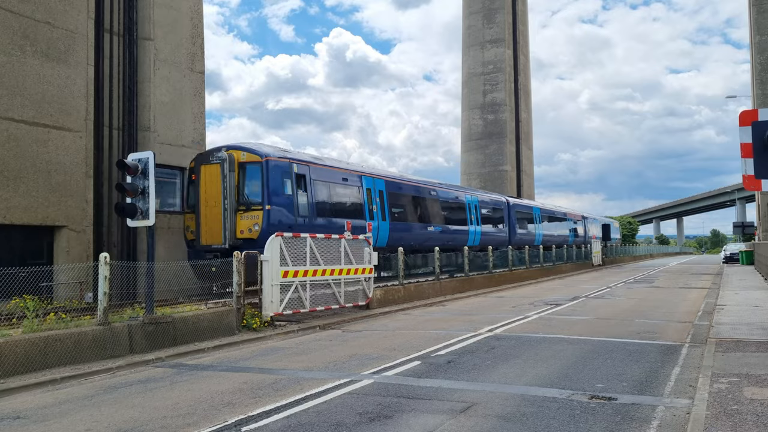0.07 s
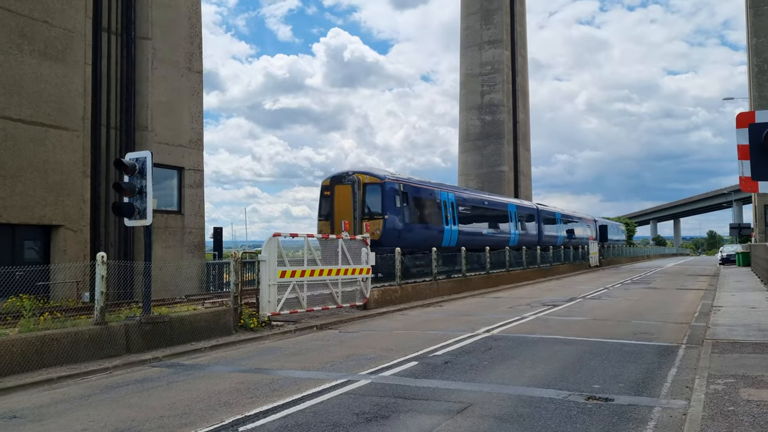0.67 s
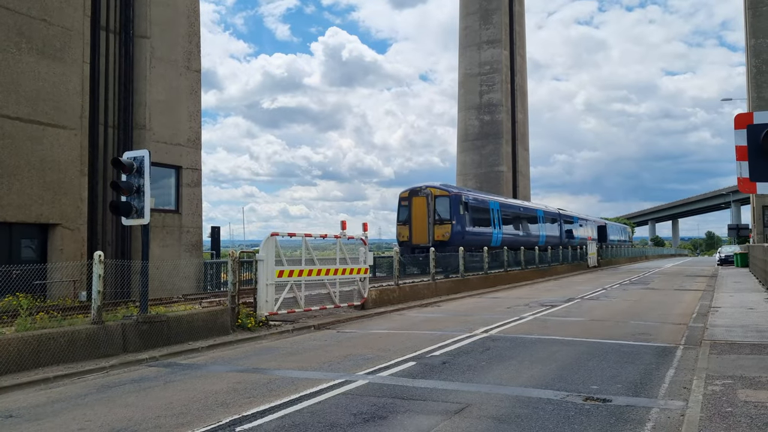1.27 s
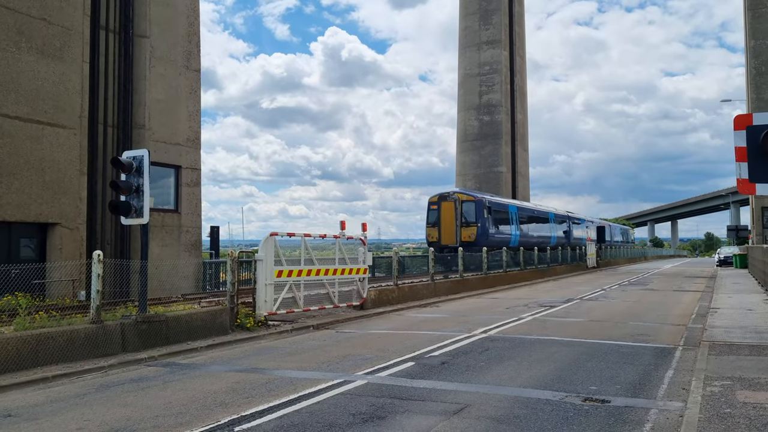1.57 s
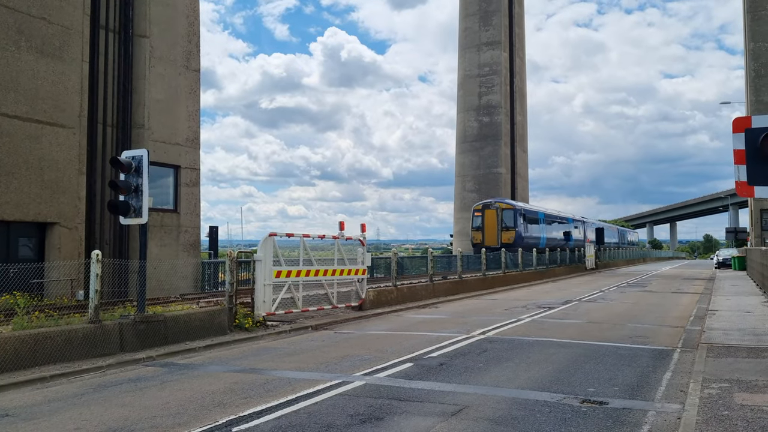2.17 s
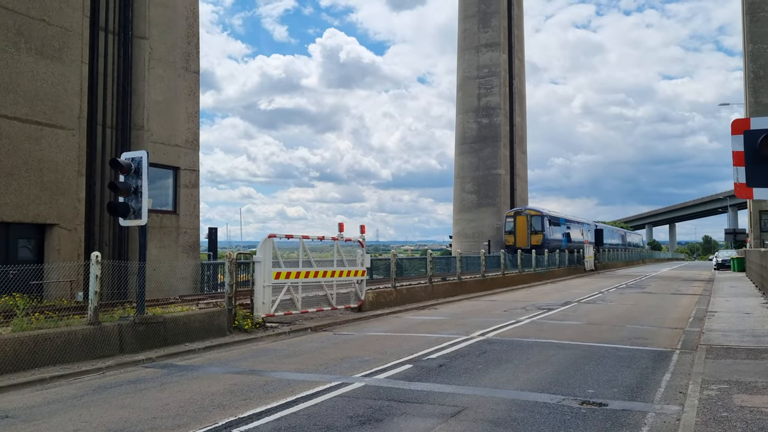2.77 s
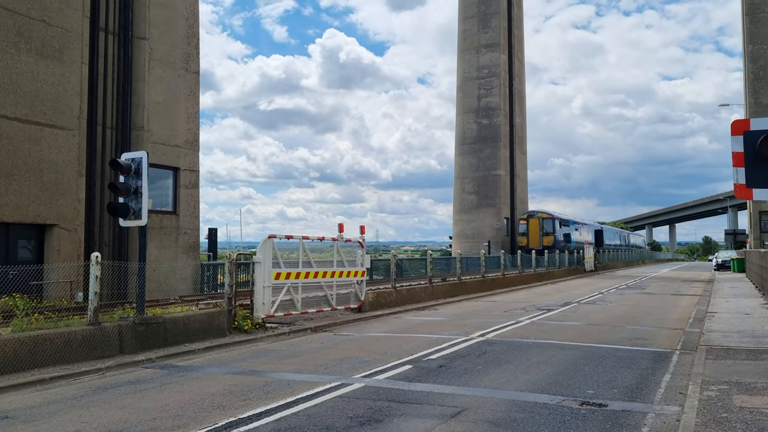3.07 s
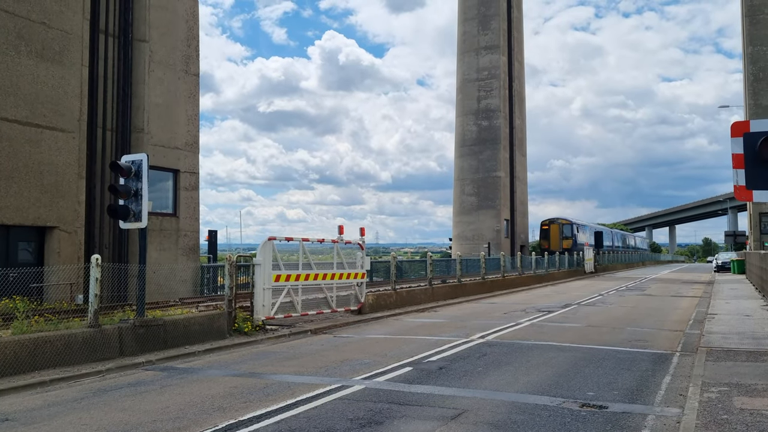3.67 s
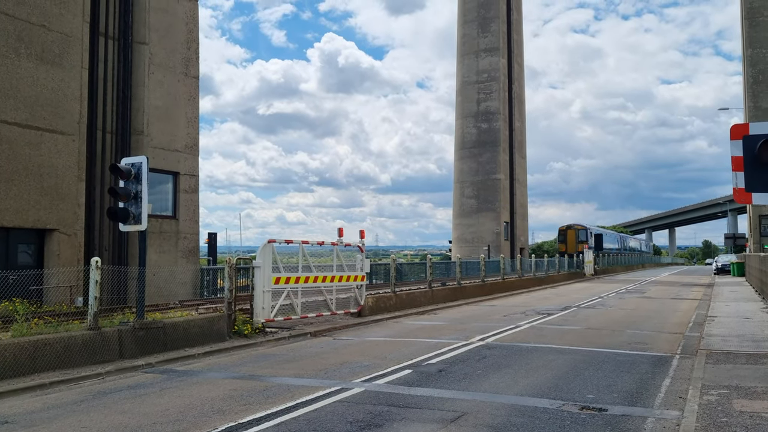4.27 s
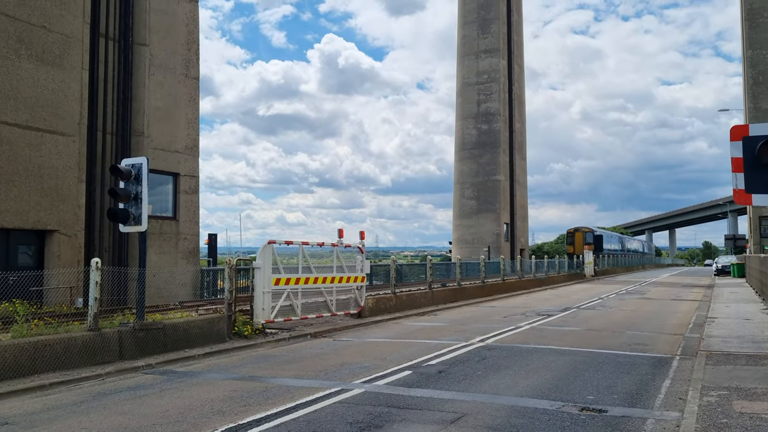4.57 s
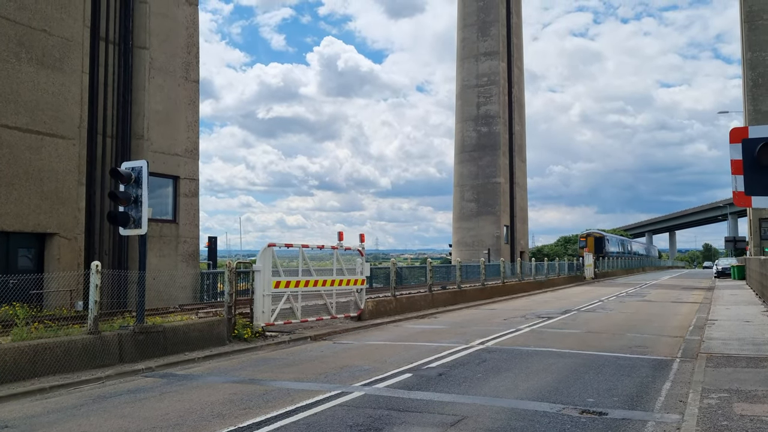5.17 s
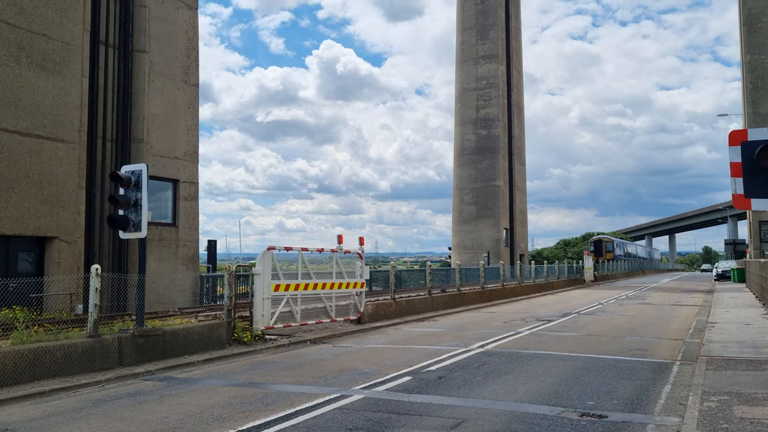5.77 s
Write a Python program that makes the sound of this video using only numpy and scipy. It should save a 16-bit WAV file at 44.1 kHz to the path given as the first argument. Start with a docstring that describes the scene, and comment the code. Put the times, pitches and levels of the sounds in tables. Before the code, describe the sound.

Heard from the road beside a steel bridge, a passing electric train opens with a loud metallic slam, then paired clacks and deep thumps over a grinding rumble. Loose deck plates give a few dull taps as it moves away, slightly to the right. Once the rumble dies down, short wind gusts hit the microphone, with a faint wavering wheel tone and far traffic behind.

```python
"""A wheel slams down close by as an electric train rumbles off a steel lift bridge, heard from the road.
Its axles hit the rail joints in pairs: each blow thumps the deck, knocks the girders, clangs in rail
and wheel, and echoes off the concrete towers. Rough wheels roar and grind, and loose deck plates tap.
As the train fades, gusts hit the microphone, far wheels sing and tyres hum on a distant road."""
import sys
import numpy as np
from scipy import signal
from scipy.fft import rfft, irfft, next_fast_len
from scipy.io import wavfile
from scipy.ndimage import map_coordinates

SR = 44100
rng = np.random.default_rng(int(sys.argv[2]) if len(sys.argv) > 2 else 0)


def unload_wav(signal):
    """Save mono or channel-first audio to the path in sys.argv[1] as 16-bit WAV at rate SR, clipped to [-1, 1]."""
    wavfile.write(
        sys.argv[1],
        SR,
        np.round(np.clip(np.atleast_2d(signal).T, -1, 1) * 32767).astype(np.int16),
    )


N = 256662
T = np.arange(N) / SR

# Table levels are relative. A mode is a note an object rings at; t60 is its time to fade by 60 dB.
# the opening slam: (time [s], clang [dB], knock [dB], thump [dB], sizzle [dB], note [dB], note [Hz],
# base build-up [s], base t60 [s])
SLAM = (0.0141, -10, -14.5, -15, -29, -23, 185, 0.009, 0.28)
# rail joints: (delay after the first joint [s], then the same columns as the slam)
JOINTS = [(0.0, -21.8, -17.5, -12.5, -48.5, -28.5, 530, 0.012, 0.62),
          (0.078, -27, -22, -21, -60, -33, 590, 0.008, 0.34),
          (1.155, -25.5, -19, -20, -60, -30, 205, 0.01, 0.46),
          (1.755, -25.3, -24, -22, -65.5, -38, 920, 0.009, 0.28)]
# bogies, the two-axle trolleys under the cars: (time at the first joint [s], wheel roughness [dB])
BOGIES = [(-1.381, 0), (-0.846, 0), (0.477, -5.5), (1.016, 1.5), (2.335, -1)]
# force of the blows, a row per bogie, a pair per joint: (front axle [dB], rear axle [dB])
BLOW_FORCE = [
    [(0, 0), (0, 0), (0, 0), (-5, -5)],
    [(0, 0), (0, 0), (0, 0), (-3, 2.5)],
    [(0, 1), (0, -6), (-0.5, -0.5), (-3, -6)],
    [(0.5, 0), (-7, -4), (-3.5, -2), (-1, 1.5)],
    [(0, 0.5), (1, 1.5), (0, 3.5), (-3.5, 1.5)],
]
# the deck answers less as the train's weight leaves it: (time [s], level [dB])
DECK_LOAD = [(0.8, 0), (1.02, 4), (1.28, 3), (1.6, -3), (2.0, -5), (2.35, -1.5), (2.6, 2.5), (3.05, 1),
             (3.5, -17), (4.4, -19)]
# modes of the bridge deck, girders and wheel discs: (pitch [Hz], level [dB], t60 [s])
DECK_MODES = [(54.4, -11, .22), (76.2, 7, 0.22), (99.2, 2, 0.1), (117.6, -9, 0.5)]
GIRDER_MODES = [(152, -3, 0.25), (232, -3, .48), (280, -7, 0.44), (325.7, -2, 0.26), (398, -8, 0.18),
                (461, -3.5, 0.4), (521.7, 0, 0.39), (562, -0.5, 0.31), (622.2, -4.5, 0.23),
                (825, -4.5, 0.1), (884.6, -7, 0.22), (1007, -15, .35), (1243, -12, 0.23),
                (1694, -8.5, 0.21), (2050, -30, 0.36)]
WHEEL_MODES = [(2120, 7, .4), (3270, 5, .35), (3560, 3, .35), (3860, -1, .3), (4450, 0, .4), (6290, -2, .4),
               (7500, -6, .35), (8300, -5, .35), (9590, -2.5, .42), (10450, -6, .35), (11330, -6, .3),
               (11500, -6, .3), (12500, -8, .3)]
# bands that the steel boosts: (centre [Hz], width [Hz], strength [dB])
STEEL_RESONANCES = [(167.6, 60, 4), (250, 31, -7), (482, 73, -6.5), (556, 24, 1.5), (1688, 88, 2.5),
                    (2072, 150, 1.5), (2750, 57, -1.5), (3350, 810, 0.5), (6170, 190, -1), (8200, 140, 0.5)]
# low, middle and high noise of a blow: (frequency [Hz], level [dB])
KNOCK_SPECTRUM = [(60, -28), (130, -3.5), (220, 1), (320, -2.5), (400, -2.5), (620, -1.5), (740, -8.5),
                  (1000, -7.5), (1500, -28), (9000, -120)]
CLANG_SPECTRUM = [(500, -26), (1000, -0.5), (1300, -0.5), (2400, -6.5), (3600, -7.5), (4400, -15.5),
                  (7500, -17.5), (9000, -41), (12000, -54)]
SIZZLE_SPECTRUM = [(2000, -16), (4500, 6.5), (8000, 0), (9500, -6), (12000, -9.5), (15500, -10)]
# rolling noise of deck, girders, wheels and rail: (frequency [Hz], level [dB])
RUMBLE_SPECTRUM = [(15, -40), (28, -2), (40, -2), (75, -1), (105, -2.5), (135, -15.5), (200, -20),
                   (900, -120)]
DRONE_SPECTRUM = [(70, -30), (130, -0.5), (200, 2), (320, -2.5), (400, -4), (580, -5.5), (750, -14),
                  (1000, -15.5), (1500, -30), (9000, -120)]
ROAR_SPECTRUM = [(500, -2), (1100, -1), (1800, -2.5), (2500, -3), (3700, -11.5), (4600, -16.5), (8000, -44)]
HISS_SPECTRUM = [(2500, -12), (4200, 1), (6500, 2.5), (7700, -8.5), (9000, -16.5), (12000, -21),
                 (15500, -23)]
# their loudness: (whole train [dB], its fall [dB/s], one bogie [dB], rise [s], hold until [s], fade [dB/s])
RUMBLE_SHAPE = (-21.8, 4.0, -22, 0.12, 0.6, 52)
DRONE_SHAPE = (-28.1, 4.6, -31.4, 0.06, 0.62, 33)
ROAR_SHAPE = (-43.3, 2, -33, 0.33, 0.36, 24)
HISS_SHAPE = (-57, 2.0, -46.2, 0.36, 0.6, 23)
# the train drops behind the bridge's side wall: (time [s], level [dB])
WALL_FADE = [(3.6, 0), (4.4, -4), (5.2, -25)]
# wheel grinding on rail: (frequency [Hz], level [dB])
GRIND_SPECTRUM = [(1500, -26), (2100, 4), (2850, 0.5), (3300, 0), (3650, -2), (4300, -9), (5400, -9),
                  (7000, -28), (12000, -60)]
# taps of loose deck plates: (time [s], level [dB])
PLATE_TAPS = [(2.044, -24), (2.072, -25), (2.777, -18), (2.962, -26.5), (3.265, -27), (4.647, -30)]
# breeze and gusts on the microphone: (frequency [Hz], level [dB])
BREEZE_SPECTRUM = [(12, -54), (20, -9), (76, 3.5), (114, -7), (173, -9.5), (208, -19), (316, -16.5),
                   (500, -36), (650, -58), (1100, -120)]
GUST_SPECTRUM = [(25, -16), (70, 1.5), (160, 0), (300, -7), (450, -15), (2000, -120)]
# single gusts: (time [s], level [dB], length [s])
GUSTS = [(3.799, -20, 0.079), (4.189, -25.5, 0.02), (4.426, -26.5, 0.035), (4.57, -25, 0.025),
         (4.966, -21, 0.08), (5.585, -26, 0.05), (5.72, -28, 0.08)]
# wheel roar from far down the line: (time [s], level [dB])
FAR_ROAR_LEVEL = [(4.3, -72), (4.55, -58), (4.85, -48), (5.0, -54), (5.82, -56)]
# far wheels singing: (time [s], upper note [Hz], upper note [dB], lower note [dB])
WHEEL_SONG = [(4.55, 1010, -64, -66), (4.72, 1005, -52, -58), (4.85, 990, -58, -55), (5.05, 985, -60, -60),
              (5.22, 980, -53, -57), (5.34, 972, -46, -57), (5.47, 935, -54, -51), (5.6, 925, -54, -50),
              (5.82, 935, -53, -49)]
# far tyres, and the background hiss of air and microphone: (frequency [Hz], level [dB])
TYRE_SPECTRUM = [(120, -60), (280, -37), (420, -7.5), (520, -5.5), (720, -3), (860, -4.5), (970, -6.5),
                 (1230, -7), (1500, -14), (1950, -17.5), (2250, -25), (3200, -25.5), (4500, -54),
                 (15000, -90)]
AIR_HISS_SPECTRUM = [(1500, -19), (3500, 2), (5000, -1.5), (7200, -7.5), (9000, -23), (12000, -26),
                     (15500, -24)]
# loudness of the far road: (time [s], level [dB])
TRAFFIC_LEVEL = [(4.4, -42.5), (5.05, -45), (5.4, -41.5), (5.82, -40.5)]
# how alike the train sounds left and right: (frequency [Hz], likeness [0-1])
LIKENESS = [(40, .95), (70, .93), (130, .86), (300, .55), (600, .7), (1200, .5), (4000, .46), (12000, .36)]
# the longer path round the microphone's body: (frequency [Hz], left side's delay [ms])
LEFT_DELAY = [(100, 0.056), (520, 0.016), (1100, 0.2), (1700, 0.13), (3000, 0.2), (4200, 0.155),
              (5800, 0.11), (8000, 0.1), (13000, 0.18)]
# that body's sound shadow: (frequency [Hz], left minus right [dB])
LEFT_SHADE = [(40, -2.0), (130, -1.8), (280, -2.8), (600, -2.5), (1100, 0), (2000, 0.5), (4000, -1),
              (12000, 1.5)]

AXLE_GAP_S = 0.241  # from a bogie's front axle to its rear one


def amp(db):
    """Turn decibels into a gain."""
    return np.exp(np.asarray(db) * (np.log(10) / 20))


def unit(x):
    """Scale a sound to an average (rms) level of 1."""
    return x / np.sqrt(np.mean(x ** 2) + 1e-20)


def along(points, hz):
    """Read between (frequency, value) points on a log frequency scale."""
    freqs, values = np.transpose(points)
    return np.interp(np.log(hz + 1), np.log(freqs + 1), values)


def curves(rows):
    """Turn each column after the time into one value per sample."""
    times, *columns = np.transpose(rows)
    return [np.interp(T, times, column) for column in columns]


def wobble(rate):
    """A smooth random curve through `rate` points a second."""
    return map_coordinates(rng.standard_normal(int(N * rate / SR) + 4), [T * rate])


def filtered(x, response):
    """Multiply each frequency in x by response(hz)."""
    size = next_fast_len(N + SR // 2)
    return irfft(rfft(x, size) * response(np.fft.rfftfreq(size, 1 / SR)), size)[..., :N]


def noise(spectrum, likeness=LIKENESS):
    """Shaped stereo noise; likeness is 1 for equal sides, 0 for unrelated, -1 for opposite."""
    def response(hz):
        angle = np.arccos(np.clip(along(likeness, hz), -1, 1)) / 2
        return amp(along(spectrum, hz)) * [np.cos(angle), np.sin(angle)]
    mid, side = filtered(rng.standard_normal((2, N)), response)
    return unit(np.array([mid + side, mid - side]))


def steel(hz):
    """Rail and girders pass every frequency but boost those near their resonances."""
    peaks = sum(amp(db) ** 2 / (1 + (2 * (hz - centre) / width) ** 2)
                for centre, width, db in STEEL_RESONANCES)
    return np.sqrt(1 + peaks)


def shaken_steel(spectrum, chatter_db, chatter_rate):
    """Uneven wheel contact shakes so many modes in the steel that they blur into noise."""
    return unit(filtered(noise(spectrum) * amp(chatter_db * wobble(chatter_rate)), steel))


def ringing(modes, times, levels_db, attack_s, scatter_db, detune):
    """Fading modes, struck at new strengths and slightly new pitches by every blow."""
    out, t = np.zeros(N + SR), np.arange(SR // 2) / SR
    for at, db in zip(times, levels_db):
        ring = np.zeros(len(t))
        for hz, mode_db, t60 in modes:
            level_draw, pitch_draw = rng.standard_normal(2)
            fade = amp(mode_db + scatter_db * level_draw - 60 * t / t60)
            ring += fade * np.sin(2 * np.pi * hz * (1 + detune * pitch_draw) * t)
        out[max(round(at * SR), 0):][:len(t)] += amp(db) * ring * (1 - np.exp(-t / attack_s))
    return out[:N]


def axle_blows():
    """The slam, then every axle meeting every joint: one array for each column of SLAM."""
    rows = [SLAM]
    for (bogie_s, _), forces in zip(BOGIES, BLOW_FORCE):
        for (delay, clang, knock, thump, sizzle, note, note_hz, lead, t60), pair in zip(JOINTS, forces):
            for axle, db in enumerate(pair):
                at = bogie_s + delay + axle * AXLE_GAP_S
                load = np.interp(at, *np.transpose(DECK_LOAD))  # the girders feel only a fifth of it
                rows.append((at, clang + db, knock + db + 0.2 * load, thump + db + load,
                             sizzle + db, note + db, note_hz, lead, t60))
    return np.transpose([row for row in rows if row[0] > 0])


def blow_envelope(times, levels_db, leads, t60s, clatter, echo_db, echo_t60):
    """Loudness over time: a wheel dips into the gap, hits, clatters, rings out, and the towers answer."""
    power = np.zeros(N)
    for at, db, lead, t60 in zip(times, levels_db, np.maximum(leads, 1e-3), t60s):
        span = slice(*np.searchsorted(T, [at - .08, at + .6]))
        since = T[span] - at
        build = np.exp(2 * np.minimum(since, 0) / lead)
        hold = clatter * t60 ** 2  # a long-ringing blow also clatters for longer
        after = np.hypot(np.maximum(since, 0), hold) - hold
        fall = amp(-60 * after / t60) ** 2 + amp(echo_db - 60 * after / echo_t60) ** 2
        power[span] += amp(db) ** 2 * fall * build
    return np.sqrt(power)


def clacks():
    """Each axle's blow thumps the deck, knocks the girders and clangs in rail and wheel."""
    at, clang_db, knock_db, thump_db, sizzle_db, _, _, lead, t60 = axle_blows()
    thump = -ringing(DECK_MODES, at + .0038, thump_db - 3, attack_s=.0029, scatter_db=1, detune=.056)
    clank = ringing(GIRDER_MODES, at, knock_db - 11, attack_s=.0014, scatter_db=3, detune=.011)
    landing = at + .028 + rng.uniform(0, .02, len(at))  # the wheel hops and comes down again
    rebound = ringing(GIRDER_MODES, landing, knock_db - 17, attack_s=.0036, scatter_db=2.5, detune=.01)
    # three bands of noise, the higher ones swelling in a little later
    knock = blow_envelope(at + .00058, knock_db - 3.5, lead * .37, t60 * .58,
                          clatter=.24, echo_db=-9.5, echo_t60=.45)
    clang = blow_envelope(at + .0033, clang_db - 8.5, lead * .87, t60 * .95,
                          clatter=.28, echo_db=-9, echo_t60=.48)
    sizzle = blow_envelope(at + .0061, sizzle_db + 4.5, lead * 1.04, t60 * .84,
                           clatter=.2, echo_db=-14.5, echo_t60=.79)
    crash = knock * shaken_steel(KNOCK_SPECTRUM, chatter_db=2.5, chatter_rate=130)
    crash += clang * shaken_steel(CLANG_SPECTRUM, chatter_db=1, chatter_rate=200)
    crash += sizzle * shaken_steel(SIZZLE_SPECTRUM, chatter_db=2, chatter_rate=300)
    return thump + clank + rebound + crash


def bending_waves():
    """Each blow sends a wave along the girder; high notes arrive first, making a short falling punch."""
    times, _, knock_db, *_ = axle_blows()
    start_hz, sweep_s, rise_s = 800, .025, .006
    out, t = np.zeros(N + SR), np.arange(SR // 10) / SR
    swell = t / rise_s * np.exp(1 - t / rise_s)
    stretches = np.exp(.2 * rng.standard_normal(len(times)))
    for at, db, stretch in zip(times, knock_db, stretches):
        hz = start_hz / (1 + t / (sweep_s * stretch)) ** 2
        out[round(at * SR):][:len(t)] += amp(db - 3.5) * swell * np.sin(2 * np.pi * np.cumsum(hz) / SR)
    return out[:N]


def joint_notes():
    """The steel under each joint has its own hollow note: four close modes beating together."""
    times, *_, note_db, note_hz, _, _ = axle_blows()
    spacing_hz, t60 = 27, .5  # for a note at 215 Hz
    out = np.zeros(N)
    for at, db, hz in zip(times, note_db, note_hz):
        spread = (hz / 215) ** .6  # higher notes are wider and die sooner
        modes = [(hz + spacing_hz * spread * k, 0, t60 / spread) for k in np.arange(4) - 1.5]
        out += ringing(modes, [at + .003], [db], attack_s=.002, scatter_db=1.5, detune=.025)
    return out


def wheel_ring():
    """Only the hardest blows set the wheel disc ringing; the ring flutters as the wheel turns."""
    times, _, _, _, sizzle_db, *_ = axle_blows()
    hard = sizzle_db > -55
    capped_db = np.minimum(sizzle_db[hard], -50)
    ring = ringing(WHEEL_MODES, times[hard], capped_db, attack_s=.02, scatter_db=2.5, detune=.002)
    return ring * amp(3 * wobble(45))


def treble_ring(x, share_db, t60, low_hz):
    """Add the countless fine, high modes of rail and wheels, which change as the train moves on."""
    t, hop = np.arange(SR // 4) / SR, SR // 4
    highpass = signal.butter(2, low_hz, "highpass", fs=SR, output="sos")
    padded = np.pad(x, ((0, 0), (hop, SR)))
    ring = np.zeros_like(padded)
    for start in range(0, N + hop, hop):  # each overlapping piece gets a fresh random tail
        tail = signal.sosfilt(highpass, rng.standard_normal(len(t)) * amp(-60 * t / t60))
        piece = padded[:, start:start + 2 * hop] * np.sqrt(np.hanning(2 * hop))
        rung = signal.fftconvolve(piece, tail[None] / np.linalg.norm(tail), axes=1)
        ring[:, start:start + rung.shape[1]] += rung
    return x + amp(share_db) * ring[:, hop:hop + N]


def rolling_level(shape):
    """The whole train fades steadily; each bogie adds a swell as it crosses the bridge."""
    train_db, fall, bogie_db, rise_s, hold_s, fade = shape
    power = amp(train_db - fall * T) ** 2
    for at, rough_db in BOGIES:
        build = np.clip((T - at) / rise_s, 0, 1) ** 2
        faded_db = fade * np.maximum(T - at - hold_s, 0)
        power += (build * amp(bogie_db + rough_db - faded_db)) ** 2
    return np.sqrt(power)


def rolling():
    """Rough wheels roar on rough rail and shake deck and girders; the rail hisses under each bogie."""
    surge_db = wobble(14)
    rumble = rolling_level(RUMBLE_SHAPE) * amp(1.8 * wobble(14)) * noise(RUMBLE_SPECTRUM)
    drone = shaken_steel(DRONE_SPECTRUM, chatter_db=2, chatter_rate=63)
    drone *= rolling_level(DRONE_SHAPE) * amp(surge_db)
    roar = shaken_steel(ROAR_SPECTRUM, chatter_db=1.3, chatter_rate=60)
    roar *= rolling_level(ROAR_SHAPE) * amp(.5 * surge_db)
    hiss = rolling_level(HISS_SHAPE) * unit(filtered(noise(HISS_SPECTRUM), steel))
    return amp(curves(WALL_FADE)[0]) * (rumble + drone + roar + hiss)


def grinding():
    """Each wheel grinds up to the wide first joint and over it; rougher wheels are louder."""
    times, levels_db = np.transpose([(at + axle * AXLE_GAP_S, -36.5 + .35 * rough_db)
                                     for at, rough_db in BOGIES if at > 0 for axle in range(2)])
    leads, t60s = np.full(len(times), .03), np.full(len(times), .55)
    level = blow_envelope(times, levels_db, leads, t60s, clatter=.25, echo_db=-18, echo_t60=.5)
    return level * shaken_steel(GRIND_SPECTRUM, chatter_db=2, chatter_rate=120)


def loose_plates():
    """Loose plates tap dully as the deck bends."""
    rise_s, t60 = .02, .09
    taps = sum(amp(db - 8.5 - 60 * np.abs(T - at) / np.where(T > at, t60, rise_s))
               for at, db in PLATE_TAPS)
    return taps * noise([(150, -28), (350, 7), (560, 12), (950, -26.5), (1500, -22), (8000, -120)])


def wind():
    """A breeze rumbles on the microphone, and later short gusts hit it."""
    breeze = amp(-35 + 1.2 * wobble(6)) * noise(BREEZE_SPECTRUM, likeness=[(60, .11), (300, 0)])
    swell = sum(amp(db - 4) * np.exp(-(2 * (T - at) / length - .7) ** 2) for at, db, length in GUSTS)
    return breeze + swell * noise(GUST_SPECTRUM, likeness=[(60, .97), (300, .1)])


def rough_note(pitch_hz, width_hz):
    """A narrow band of noise round a steady or moving pitch."""
    phase = 2 * np.pi * np.cumsum(pitch_hz * np.ones(N)) / SR
    return unit(wobble(width_hz) * np.sin(phase) + wobble(width_hz) * np.cos(phase))


def far_wheels():
    """From far down the line only the middle pitches of the roar arrive; two wavering notes swell in it."""
    roar = noise([(500, -20), (900, -2), (1900, -5), (2400, -13), (3500, -25.5), (12000, -74)])
    roar *= amp(curves(FAR_ROAR_LEVEL)[0])
    upper_hz, upper_db, lower_db = curves(WHEEL_SONG)
    upper = amp(upper_db) * rough_note(upper_hz, width_hz=95)
    lower = amp(lower_db) * rough_note(pitch_hz=718, width_hz=55)
    return roar + upper + lower


def traffic_and_hiss():
    """Tyres on a far road over a faint, steady hiss of air and microphone, a little louder on the right."""
    traffic_db, = curves(TRAFFIC_LEVEL)
    tyres = noise(TYRE_SPECTRUM, likeness=[(300, -.18), (1400, -.55), (3000, -.4), (7000, -.12)])
    air_hiss = amp(-67) * noise(AIR_HISS_SPECTRUM, likeness=[(3000, -.27), (7000, -.032)])
    return (amp(traffic_db + wobble(14)) * tyres + air_hiss) * amp([[-.6], [2]])


def from_the_right(x):
    """Sound reaches the left side later; its low notes are weaker there while the train is close."""
    sides = np.array([[.5], [-.5]])
    late = filtered(x, lambda hz: np.exp(-2j * np.pi * hz * sides * along(LEFT_DELAY, hz) / 1000))
    shaded = filtered(late, lambda hz: amp(sides * along(LEFT_SHADE, hz)))
    close = np.interp(T, [3.6, 5], [1, 0])
    return close * shaded + (1 - close) * late


def scene():
    """The train ahead and to the right, with traffic, faint hiss and wind around it."""
    train = clacks() + bending_waves() + joint_notes() + grinding() + loose_plates() + rolling()
    train = treble_ring(train, share_db=-9, t60=.12, low_hz=2560)
    return from_the_right(train + wheel_ring() + far_wheels()) + traffic_and_hiss() + wind()


def record(dry):
    """The microphone drops the deepest bass, rounds off the loudest peaks and cuts the highest treble."""
    ceiling, top_hz = .92, 15700
    lean = filtered(dry, lambda hz: amp(along([(18, -32), (25, -12), (32, 0)], hz)))
    soft = lean / (1 + np.abs(lean / ceiling) ** 8) ** (1 / 8)
    return filtered(soft, lambda hz: hz < top_hz)


dry = scene()
out = record(dry)
unload_wav(out)
```